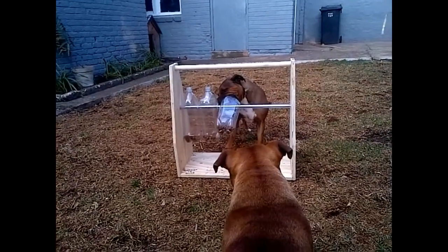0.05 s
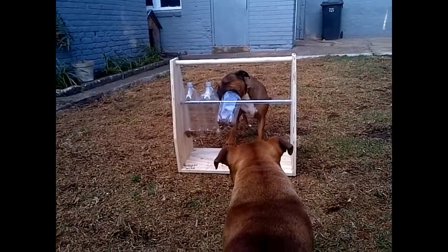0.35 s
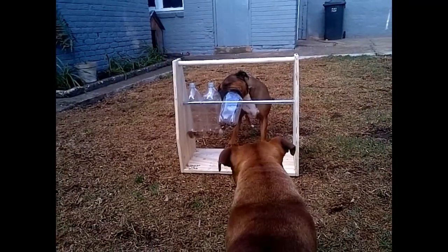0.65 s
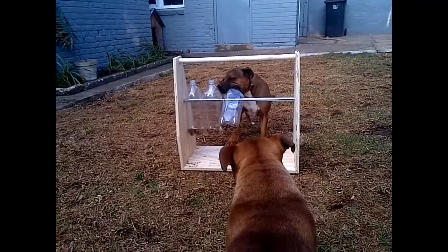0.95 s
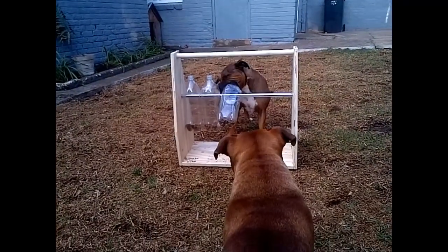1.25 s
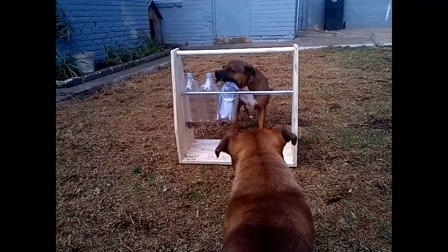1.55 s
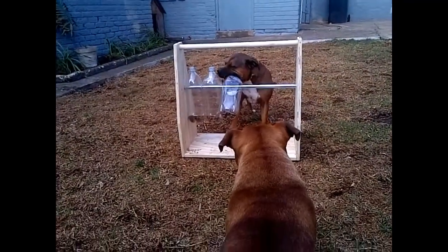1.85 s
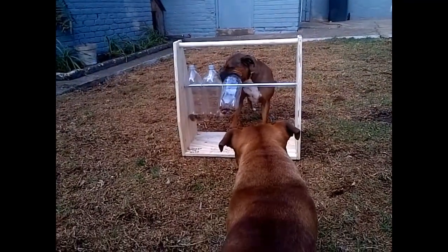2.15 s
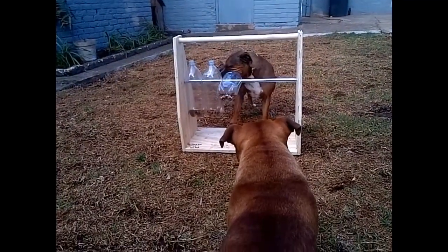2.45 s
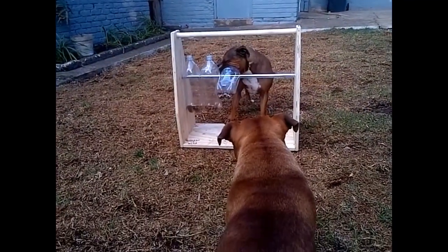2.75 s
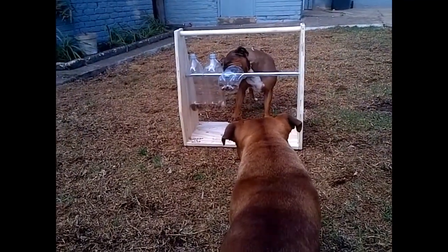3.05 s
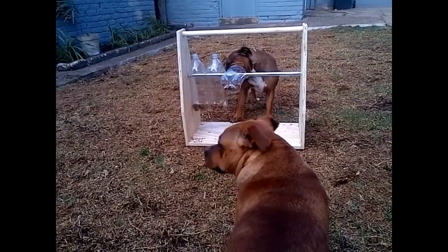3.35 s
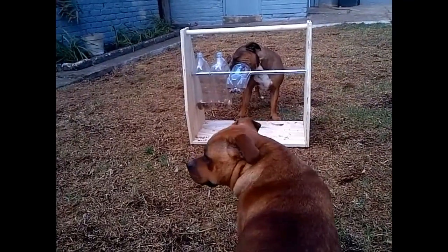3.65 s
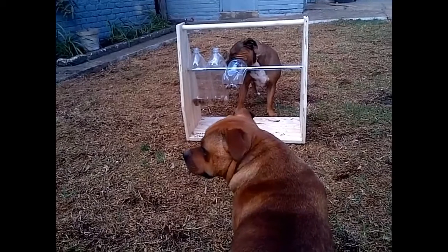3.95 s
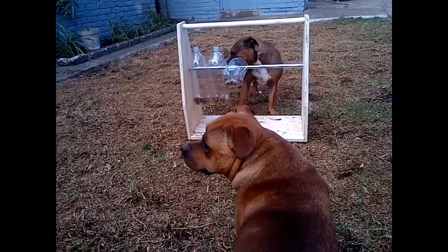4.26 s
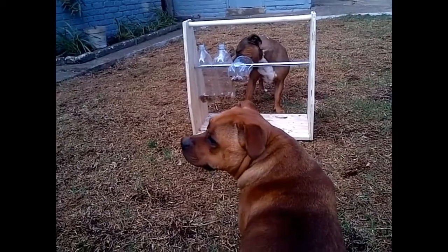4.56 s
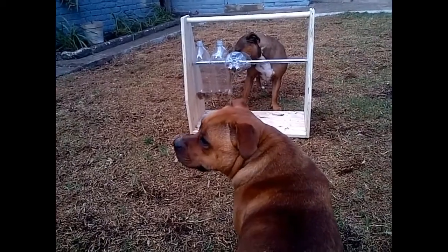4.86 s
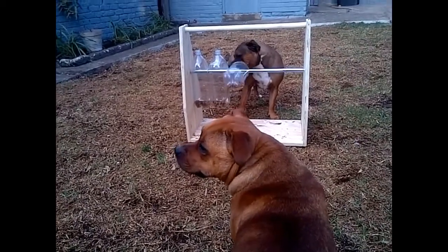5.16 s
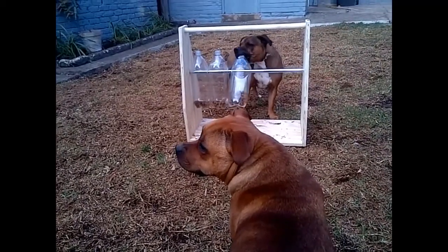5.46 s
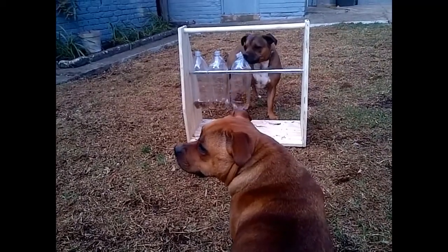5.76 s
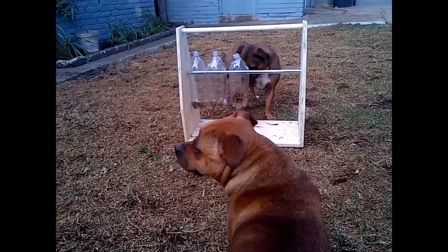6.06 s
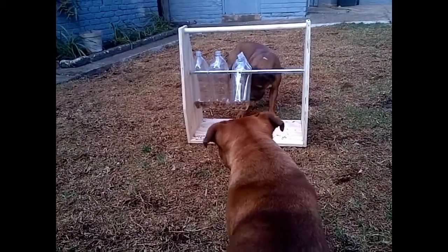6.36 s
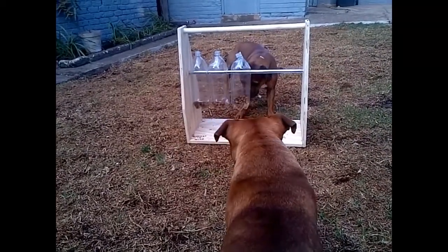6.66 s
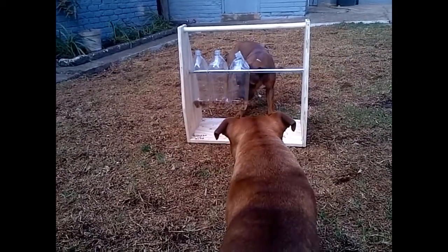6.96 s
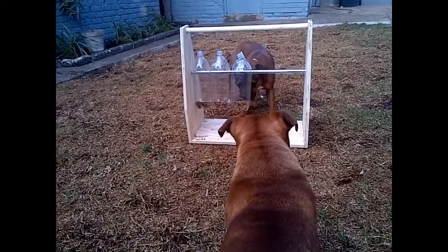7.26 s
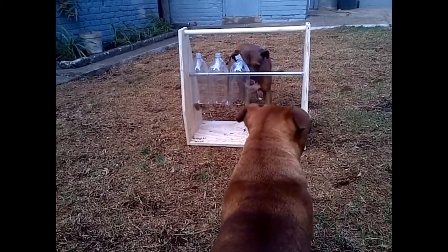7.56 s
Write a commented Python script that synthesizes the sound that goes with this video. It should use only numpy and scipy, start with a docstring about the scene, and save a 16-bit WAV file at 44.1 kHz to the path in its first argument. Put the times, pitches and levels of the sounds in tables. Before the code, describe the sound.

Hollow knocks, crinkles and a loud snap from plastic bottles nosed by a dog, with outdoor birds and a far traffic rumble.

```python
"""Dog at hanging bottles

A dog noses and paws empty plastic bottles on a rod in a wooden frame, in a walled back yard.
Knocks ring the hollow bodies, plastic crinkles under the muzzle, and once a wall buckles with a snap.
Songbirds whistle, a large bird cries far off, and distant engines drone over a traffic rumble.
The yard walls echo the bottles and the birds."""
import sys
import numpy as np
from scipy import signal
from scipy.io import wavfile

SR = 44100
rng = np.random.default_rng(int(sys.argv[2]) if len(sys.argv) > 2 else 0)


def to_wav(s):
    """Save 16-bit WAV."""
    ch = np.atleast_2d(s).T  # columns
    pcm = np.round(np.clip(ch, -1, 1) * 32767)  # PCM
    wavfile.write(sys.argv[1], SR, pcm.astype(np.int16))


N = 335160
TIME_S = np.arange(N) / SR

# outdoor air and far traffic: freq_hz, relative_density_db
AIR_SPECTRUM = [(15, -37), (25, -8), (59, 0), (86, 1), (183, -6), (253, -9.5), (410, -17.5), (1020, -19.5),
                (1570, -26.5), (2170, -28.5), (3170, -28), (5580, -35), (14300, -37.5), (15500, -44)]
# far machine: time_s, pitch_hz, level_db
HUM_CURVE = [(0, 132.5, -55), (1.5, 133.5, -62.5), (3.5, 133.5, -47.5), (4.1, 135.2, -64),
             (7.6, 138.9, -57.5)]
# distant engines: start_s, length_s, start_firing_hz, rise_hz_per_s, level_db
ENGINE_PULLS = [(.2, 2.73, 65.44, 0.9, -49.5), (2.62, 0.7, 76, 3, -35), (3.22, .34, 77.8, 12, -38),
                (3.35, 0.69, 42.7, 15.5, -44.5), (4.05, .85, 112.3, 22.5, -49),
                (4.302, 1.17, 57.8, 15.5, -46), (5.1, 0.68, 71.2, -2, -44.5), (6.351, 0.69, 86.4, 11, -45),
                (6.852, 0.46, 46, 6, -46), (7.15, 0.44, 98.4, 15, -47.5)]
# decay between the house walls: freq_hz, t60_s
YARD_DECAY = [(150, 0.96), (400, 0.64), (800, 0.37), (2000, 0.54), (5000, 0.39), (9000, 0.34),
              (15000, 0.23)]

# songbird note shapes: time_in_note_s, pitch_hz, gain_db
SLUR_CURVE = [(0, 4420, -10), (.04, 4880, -8.5), (.07, 4410, -1), (.1, 3510, 6), (.125, 2700, -3),
              (.145, 2176, -4.5)]
ARCH_CURVE = [(0, 3350, 2.5), (.025, 2680, -2.5), (.055, 3400, 8), (.08, 3500, -5), (.11, 3100, 2.5),
              (.13, 2900, -29)]
FLICK_CURVE = [(0, 5580, -22), (.035, 6900, -20.5), (.055, 5820, -9), (.068, 4200, -2.5), (.08, 3500, -25)]
CHIRP_CURVE = [(0, 4600, 1), (.02, 5700, -15), (.05, 5160, -3.5), (.08, 3970, -1), (.11, 2800, 1)]
RASP_CURVE = [(0, 5300, -6), (.03, 4380, 2), (.06, 3200, 2.5), (.09, 2250, -10)]
# notes sung in each shape: start_s, level_db
SLUR_NOTES = [(4.312, -43.5), (6.06, -47.5)]
ARCH_NOTES = [(.23, -56.5), (1.282, -60.5), (2.589, -55.5), (3.288, -58.5), (3.539, -54.5), (4.48, -63),
              (5.05, -58.5), (5.866, -56), (6.181, -48.5), (6.78, -56), (7.498, -56.5)]
FLICK_NOTES = [(3.04, -47.5), (4.88, -49.5), (6.444, -49)]
CHIRP_NOTES = [(.19, -50.5), (3.655, -52.5), (5.041, -57), (5.848, -50), (7.049, -51)]
RASP_NOTES = [(1.135, -56.5), (2.84, -53.5)]
# plain whistles: start_s, length_s, mid_pitch_hz, glide_hz_per_s, level_db, buzz_ratio
WHISTLE_NOTES = [(1.107, .045, 4580, -3, -55.5, .01), (2.77, 0.085, 4640, 0, -64, 0.011),
                 (5.422, 0.062, 3720, -3000, -57, .022), (6.2, .2, 2067, 703, -53.5, 0.013),
                 (6.487, 0.1745, 1996, -200, -59, 0.011), (7.04, .12, 1668, 0, -60.5, 0.019),
                 (7.45, 0.15, 1710, -700, -58.5, .012)]

# large bird's cries: start_s, length_s, top_pitch_hz, level_db, roughness_ratio
THIN_CALL = (4.42, 0.61, 595, -54, 0.56)
HARSH_CALLS = [(4.67, .21, 687.3, -32.5, 0.83), (4.985, .21, 658.5, -29.8, .45),
               (5.735, 0.1836, 640.6, -31.5, 0.47)]
# its throat response: freq_hz, gain_db
THIN_RESPONSE = [(590, 6), (1180, 2), (1770, -3), (2360, -7.5), (2950, -12), (4000, -34)]
HARSH_RESPONSE = [(640, 0.5), (1300, -4), (2000, -14), (2300, -8), (2700, -35), (4000, -44)]

# muzzle on the plastic: start_s, hold_s, level_db
MUZZLE_PUSHES = [(0.167, 0.043, -46.5), (0.411, .005, -38.5), (0.729, 0.036, -46), (0.858, .01, -37.5),
                 (1.48, 0.24, -52), (1.914, 0.0084, -50.5), (2.46, 0.23, -55.5), (3.036, 0.18, -52),
                 (3.675, 0.011, -48), (4.051, 0.21, -54.5), (4.942, 0.24, -46.5), (5.651, 0.38, -54),
                 (6.835, 0.0045, -50.5)]
# bottle on its rod: freq_hz, gain_db, t60_s
BOTTLE_MODES = [(176.3, -11, 0.045), (273, 1.5, 0.024), (306.4, -2.5, 0.035), (419, -9, 0.035),
                (496.6, 3.5, 0.024), (552.5, 4.5, 0.02), (632, -3, 0.044), (855, 3.5, 0.014),
                (1070, 1.5, 0.027), (1163, -5.5, 0.025), (1580, -9, 0.016), (1910, -36, 0.036)]
# bottle knocks: start_s, body_db, thump_db, click_db
BOTTLE_KNOCKS = [(0.06, -44.5, -32, -53), (0.165, -59, -22, -55), (0.204, -32, -32, -39),
                 (0.348, -31, -27, -49), (0.376, -43, -40, -44), (0.399, -18.5, -13.5, -35.5),
                 (0.429, -43, -25, -46), (0.448, -38, -25, -44.5), (0.516, -34.5, -48, -42),
                 (0.831, -46, -32, -53), (0.853, -24, -21, -35.5), (0.866, -40, -18, -47),
                 (0.912, -25.5, -24.5, -44), (1.411, -43.5, -32, -51), (1.579, -39, -26.5, -58),
                 (1.667, -30, -15.5, -38.5), (1.724, -33, -45, -39.5), (1.776, -35, -33, -49),
                 (2.499, -40.5, -27, -53), (2.652, -43, -40, -58), (3.035, -43, -31, -64),
                 (3.175, -37, -23.5, -48), (3.662, -34.5, -25, -51), (4.16, -39, -27.5, -46.5),
                 (4.332, -25, -16, -36), (5.727, -37.5, -49, -35.5), (5.952, -40, -42, -37),
                 (5.974, -34, -38, -39), (5.991, -37, -50, -48), (6.018, -41, -43, -38),
                 (6.047, -31, -39, -41), (6.12, -39.5, -45, -36), (6.163, -39, -51, -41),
                 (6.35, -55, -49, -45.5), (6.835, -49, -38, -48), (7.333, -36, -25, -46)]
# two quick buckles of the snap: start_s, body_db, thump_db, bending_wave_db, crackle_db
SNAP_BUCKLES = [(1.9892, -17, -9, -26, -23), (1.9908, -23, -24, -12.5, -19)]
# thin plastic rubbed, knocked and buckled: freq_hz, relative_gain_db
RUB_SPECTRUM = [(120, -12), (220, 5.5), (550, -1), (1050, -3), (1700, -18.5), (3200, -19.5), (5500, -24),
                (8000, -38.5), (15000, -49)]
CLICK_SPECTRUM = [(700, -14), (1500, 5.5), (2300, 6), (2750, 2.5), (3200, 4), (3900, -3.5), (4330, 0),
                  (4700, -3), (5900, -7.5), (6500, -17.5), (10300, -15), (11200, -27), (12800, -15),
                  (15500, -14)]
BUCKLE_SPECTRUM = [(350, -14), (650, 2), (1150, 5), (1400, 0), (1800, -1), (2800, -2), (3500, -.5),
                   (4000, 0), (4330, 3.5), (4750, -.5), (5900, .5), (6600, -8), (10300, -10.5),
                   (11200, -16), (12800, -13), (15500, -16)]
# yard's echo of the snap: freq_hz, relative_gain_db
SNAP_ECHO_SPECTRUM = [(150, -6), (240, -5), (310, 2), (390, 10), (520, 0), (700, -1), (1100, 2.5),
                      (2500, 3), (4300, 1), (8000, -.5), (14000, -6)]


def from_db(db):
    """Decibels to gain."""
    return 10 ** (np.asarray(db) / 20)


def unit_rms(x):
    """Scale to rms 1."""
    return x / np.sqrt(np.mean(x ** 2) + 1e-20)


def at_hz(table, hz):
    """Read a table on a log-frequency axis."""
    known_hz, values = np.transpose(table)
    return np.interp(np.log(hz), np.log(known_hz), values)


def add(out, start_s, sound):
    """Mix a sound in at start_s."""
    start = int(np.clip(round(start_s * SR), 0, N))
    out[start:start + len(sound)] += sound[:N - start]


def drift(rate_hz, t):
    """Smooth random curve, spread near 1."""
    knots = rng.standard_normal(int(8 * rate_hz) + 2)
    return np.interp(t * rate_hz, np.arange(len(knots)), knots)


def arch(start_s, length_s):
    """Times of one call or pull, and its half-sine effort."""
    t = np.arange(0, length_s, 1 / SR)
    return start_s + t, np.sin(np.pi * t / length_s)


def sine(t, hz, waver_ratio, waver_rate_hz):
    """Sine of rms 1 with random pitch waver."""
    pitch_hz = hz * (1 + waver_ratio * drift(waver_rate_hz, t))
    return np.sqrt(2) * np.sin(2 * np.pi * np.cumsum(pitch_hz) / SR)


def tone(curve, waver_ratio, waver_rate_hz, fade_s):
    """Wavering sine along a pitch and level curve, with soft ends."""
    time_s, pitch_hz, level_db = np.transpose(curve)
    t = np.arange(time_s[0], time_s[-1], 1 / SR)
    window = np.clip(np.minimum(t - t[0], t[-1] - t) / fade_s, 0, 1)
    gain = from_db(np.interp(t, time_s, level_db))
    return window * gain * sine(t, np.interp(t, time_s, pitch_hz), waver_ratio, waver_rate_hz)


def noise_bands(size):
    """Half-octave noise bands of equal density: centre_hz, noise."""
    edges_hz = np.geomspace(22, 17000, 20)
    white = rng.standard_normal((2, size + SR // 4))
    for k, (low_hz, high_hz) in enumerate(zip(edges_hz, edges_hz[1:])):
        bandpass = signal.butter(2, [low_hz, high_hz], "band", fs=SR, output="sos")
        yield np.sqrt(low_hz * high_hz), signal.sosfilt(bandpass, white[k % 2])[-size:]


def coloured(x, spectrum):
    """Minimum-phase filter; white noise keeps its level."""
    hz = np.linspace(0, SR / 2, 513)
    power = from_db(2 * at_hz(spectrum, hz + 1))
    response = signal.minimum_phase(signal.firwin2(1023, hz, power, fs=SR))
    return signal.fftconvolve(x, response / np.sqrt(np.sum(response ** 2)))[:N]


def yard_echoes(x, t60_scale, build_s, spectrum):
    """Reflections off walls and fences build up, then die band by band."""
    t = TIME_S[:SR]
    tail = sum(noise * from_db(at_hz(spectrum, hz) - 60 * t / (t60_scale * at_hz(YARD_DECAY, hz)))
               for hz, noise in noise_bands(SR))
    tail *= 1 - np.exp(-(t / build_s) ** 2)
    return signal.fftconvolve(x, tail / np.sqrt(np.sum(tail ** 2)))[:N]


def air(level_db=-50):
    """Traffic rumble below, smooth hiss above."""
    wash = sum(noise * from_db(at_hz(AIR_SPECTRUM, hz) + 0.2 * drift(1.49, TIME_S))
               for hz, noise in noise_bands(N))
    return from_db(level_db) * unit_rms(wash)


def engines():
    """Firing tones of far vehicles swell and fade over a faint machine hum."""
    out = np.zeros(N)
    add(out, 0, tone(HUM_CURVE, waver_ratio=0.014, waver_rate_hz=24, fade_s=0.023))
    for start_s, length_s, start_hz, rise_hz_per_s, level_db in ENGINE_PULLS:
        t, effort = arch(start_s, length_s)
        firing_hz = start_hz + rise_hz_per_s * (t - start_s)
        drone = sine(t, firing_hz, waver_ratio=0.017, waver_rate_hz=21)
        add(out, start_s, from_db(level_db) * effort ** 1.34 * drone)
    return out


def songbirds(sag_ratio=0.023):
    """Five note shapes and plain whistles, heard mostly off the walls."""
    song = np.zeros(N)
    kinds = ((SLUR_CURVE, SLUR_NOTES, 0.028), (ARCH_CURVE, ARCH_NOTES, 0.04),
             (FLICK_CURVE, FLICK_NOTES, 0.01), (CHIRP_CURVE, CHIRP_NOTES, 0.07),
             (RASP_CURVE, RASP_NOTES, 0.09))
    for curve, notes, buzz_ratio in kinds:
        for start_s, level_db in notes:
            note = tone(curve, buzz_ratio, waver_rate_hz=700, fade_s=0.002)
            add(song, start_s, from_db(level_db) * note)
    for start_s, length_s, mid_hz, glide_hz_per_s, level_db, buzz_ratio in WHISTLE_NOTES:
        t, effort = arch(start_s, length_s)
        pitch_hz = (mid_hz + glide_hz_per_s * (t - t.mean())) * (1 - sag_ratio * (1 - effort))
        whistle = sine(t, pitch_hz, buzz_ratio, waver_rate_hz=300)
        add(song, start_s, from_db(level_db) * np.sqrt(effort) * whistle)
    echo = yard_echoes(song, t60_scale=1.24, build_s=0.0013,
                       spectrum=[(2000, 0), (5000, -7.5), (12000, 7.5)])
    return from_db(-7) * song + echo


def cry(call, throat, swell_power, sag_ratio=0.09):
    """Harmonic call: pitch and level arch with effort; uneven cycles smear the upper partials."""
    start_s, length_s, top_hz, level_db, roughness = call
    t, effort = arch(start_s, length_s)
    pitch_hz = top_hz * (1 - sag_ratio * (1 - effort))
    jitter = 1 + 0.085 * roughness * drift(600, t)
    phase = 2 * np.pi * np.cumsum(pitch_hz * jitter) / SR
    partials = sum(from_db(at_hz(throat, k * pitch_hz)) * np.sin(k * phase) for k in range(1, 7))
    shimmer = 1 + 0.33 * roughness * drift(450, t)
    return from_db(level_db) * effort ** swell_power * partials * shimmer


def large_bird():
    """One thin cry and three harsh ones ring between the houses."""
    cries = np.zeros(N)
    add(cries, THIN_CALL[0], cry(THIN_CALL, THIN_RESPONSE, swell_power=0.31))
    for call in HARSH_CALLS:
        add(cries, call[0], cry(call, HARSH_RESPONSE, swell_power=1.1))
    echo = yard_echoes(cries, t60_scale=1.64, build_s=0.012, spectrum=[(600, -3.5), (12000, 1)])
    return cries + from_db(-1) * echo


def muzzle_pressure(attack_s=0.025, release_db_per_s=97):
    """Muzzle force as a gain: each push builds, holds and dies away."""
    push = np.zeros(N)
    t = TIME_S[:SR] - attack_s
    attack = np.clip(1 + t / attack_s, 0, 1)
    for start_s, hold_s, level_db in MUZZLE_PUSHES:
        drop_db = release_db_per_s * np.maximum(t - hold_s, 0)
        add(push, start_s - attack_s, attack * from_db(level_db - drop_db))
    return push


def rubbing(push):
    """Plastic sticks and slips under the muzzle in clumps of tiny crinkles."""
    slipping = rng.random(N) < 1400 * from_db(4 * drift(45, TIME_S)) / SR
    sign = rng.choice([-1, 1], N)
    size_db = 2.9 * np.minimum(rng.exponential(1, N), 4)
    return push * unit_rms(coloured(slipping * sign * from_db(size_db), RUB_SPECTRUM))


def taps(push, rate_hz=22, spread_db=3, body_db=5.5, thump_db=10.5, click_db=-3):
    """The pushed bottle taps lightly at random; rows as in BOTTLE_KNOCKS."""
    gap_draw, level_draw = rng.random((400, 2)).T
    times_s = np.cumsum(0.5 + gap_draw) / rate_hz
    push_db = 20 * np.log10(np.interp(times_s, TIME_S, push, right=0) + 1e-9)
    levels_db = push_db + spread_db * (2 * level_draw - 1)
    return [(start_s, db + body_db, db + thump_db, db + click_db)
            for start_s, db in zip(times_s, levels_db) if db > -60]


def strike(thump_db, body_db, thump_top_hz=420):
    """A blow rings every mode, a little differently each time as the bottle flexes."""
    hz, mode_db, t60_s = np.transpose(BOTTLE_MODES)[:, :, None]
    t = TIME_S[:SR // 8]
    uneven_db = rng.normal(0, 1.5, hz.shape)
    detune = rng.normal(0, 0.025, hz.shape)
    gain = from_db(np.where(hz < thump_top_hz, thump_db, body_db) + mode_db + uneven_db)
    sign = (-1) ** np.arange(len(hz))[:, None]
    modes = from_db(-60 * t / t60_s) * np.sin(2 * np.pi * hz * (1 + detune) * t)
    return np.sum(sign * gain * modes, axis=0)


def crackle(burst_decay_s, tick_db, tick_decay_s, tick_rate_hz=1500):
    """The bottle wall gives in a dense burst, then settles with scattered ticks."""
    t = TIME_S[:SR // 12]
    ticks = rng.random(len(t)) < tick_rate_hz / SR
    envelope = np.exp(-t / burst_decay_s) + ticks * from_db(tick_db) * np.exp(-t / tick_decay_s)
    return rng.standard_normal(len(t)) * envelope


def knocks(rows):
    """Bottles bump the rod, the muzzle and each other; soft contacts dull the click."""
    body, wall = np.zeros(N), np.zeros(N)
    for start_s, body_db, thump_db, click_db in rows:
        add(body, start_s, strike(thump_db, body_db))
        click = crackle(burst_decay_s=0.0064, tick_db=5, tick_decay_s=0.0093)
        add(wall, start_s, from_db(click_db) * click)
    soft_contact = signal.butter(1, 6000, fs=SR)
    return body + signal.lfilter(*soft_contact, coloured(wall, CLICK_SPECTRUM))


def snap(sweep_s=0.003, top_hz=16000):
    """The thin wall buckles: a hard blow, a bending wave whose treble runs ahead, loose ticks."""
    body, wall = np.zeros(N), np.zeros(N)
    t = TIME_S[:int(sweep_s * SR)]
    bending_wave = np.sin(2 * np.pi * top_hz * (t - t ** 2 / (2 * sweep_s)))
    for start_s, body_db, thump_db, wave_db, crackle_db in SNAP_BUCKLES:
        add(body, start_s, strike(thump_db, body_db))
        add(wall, start_s, from_db(wave_db) * bending_wave)
        burst = crackle(burst_decay_s=0.003, tick_db=3, tick_decay_s=0.018)
        add(wall, start_s, from_db(crackle_db) * burst)
    return body + coloured(wall, BUCKLE_SPECTRUM)


def scene():
    """Bottles in front of birds and traffic; the snap echoes more than the clatter."""
    background = air() + engines() + songbirds() + large_bird()
    crack = snap()
    crack_echo = yard_echoes(crack, t60_scale=1.17, build_s=0.0022, spectrum=SNAP_ECHO_SPECTRUM)
    push = muzzle_pressure()
    clatter = rubbing(push) + knocks(BOTTLE_KNOCKS + taps(push))
    clatter_echo = yard_echoes(clatter, t60_scale=0.93, build_s=0.0025,
                               spectrum=[(150, -2.5), (500, 3), (2500, -1), (14000, -7)])
    echoes = from_db(-10.5) * clatter_echo + from_db(-5) * crack_echo
    return (background + clatter + crack + echoes)[None]


def record(dry):
    """Soft clip, then a steep low-pass."""
    cutoff_hz = 15700
    lowpass = signal.ellip(10, 0.1, 80, cutoff_hz, fs=SR, output="sos")
    return signal.sosfilt(lowpass, np.tanh(dry))


dry = scene()
out = record(dry)
to_wav(out)
```